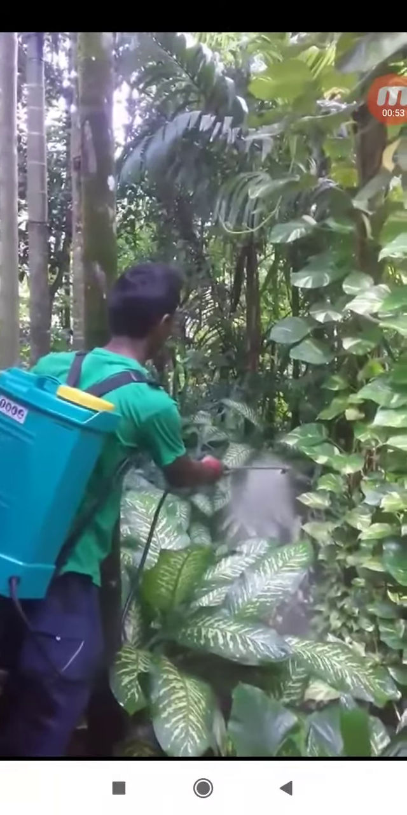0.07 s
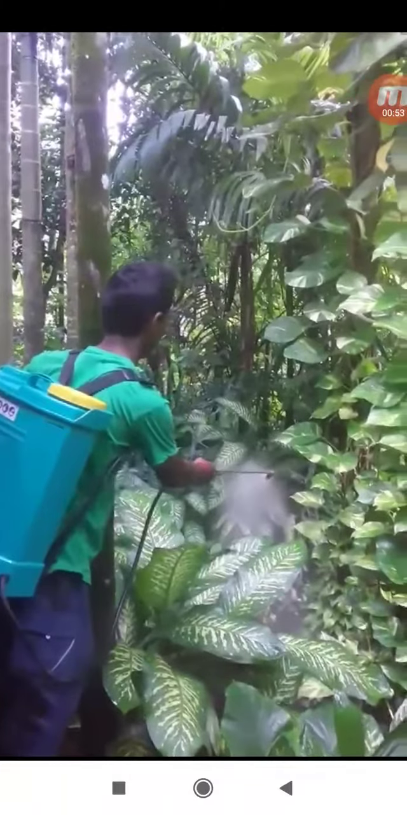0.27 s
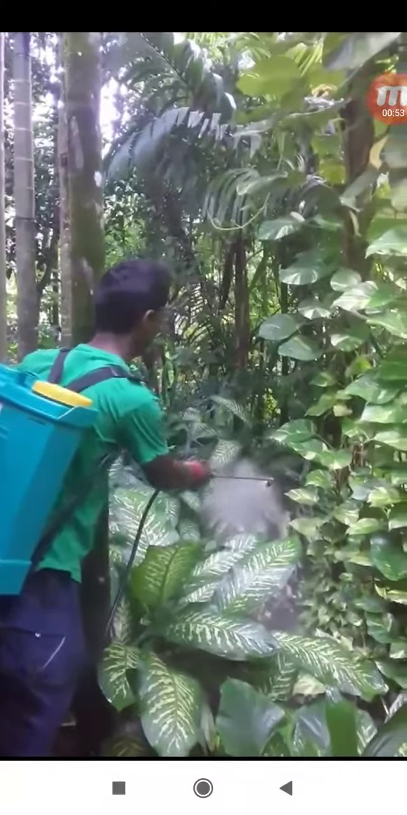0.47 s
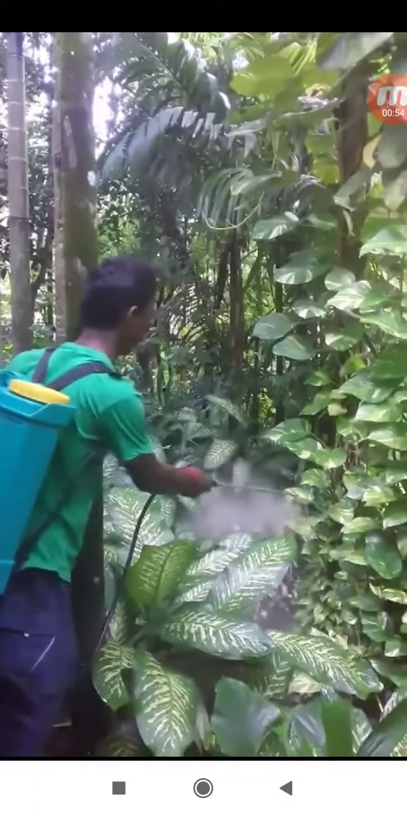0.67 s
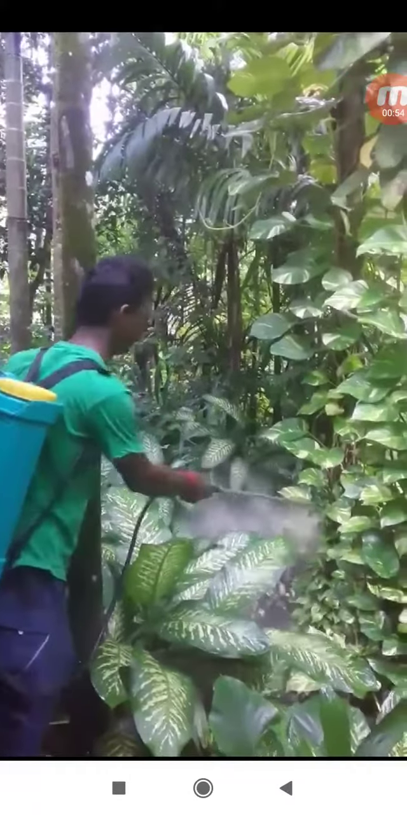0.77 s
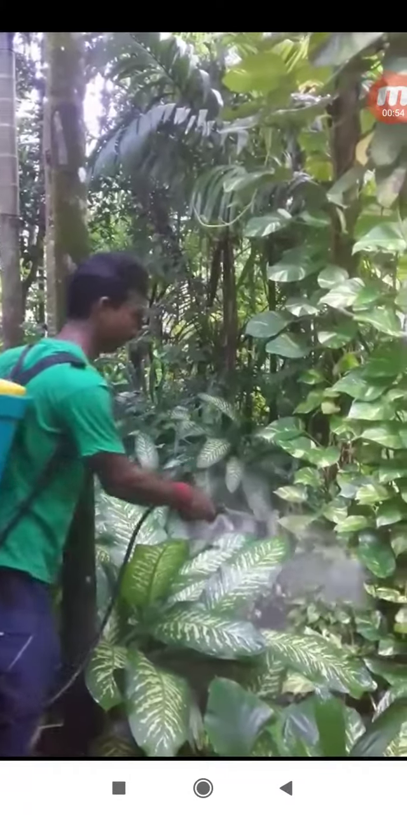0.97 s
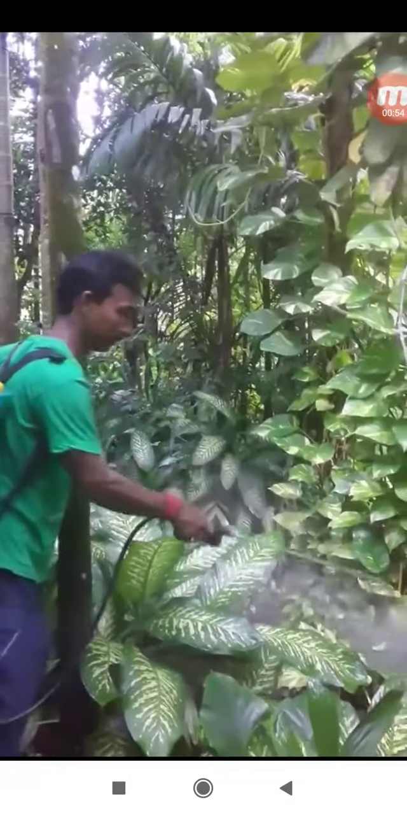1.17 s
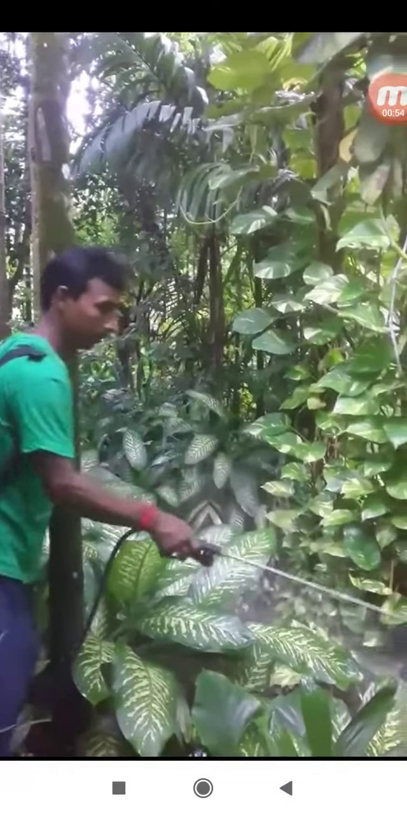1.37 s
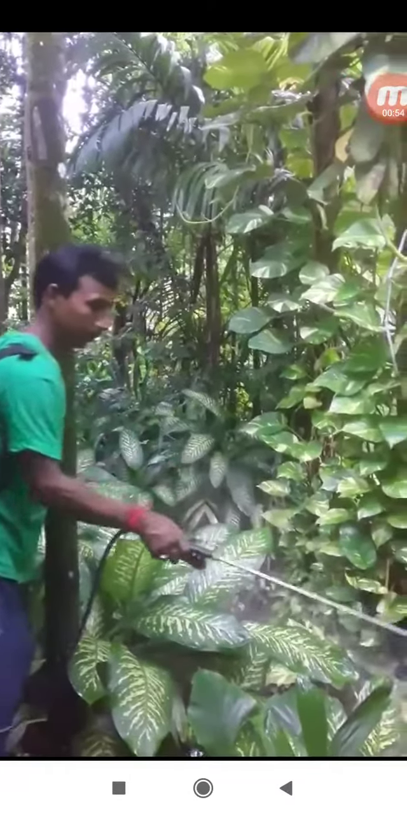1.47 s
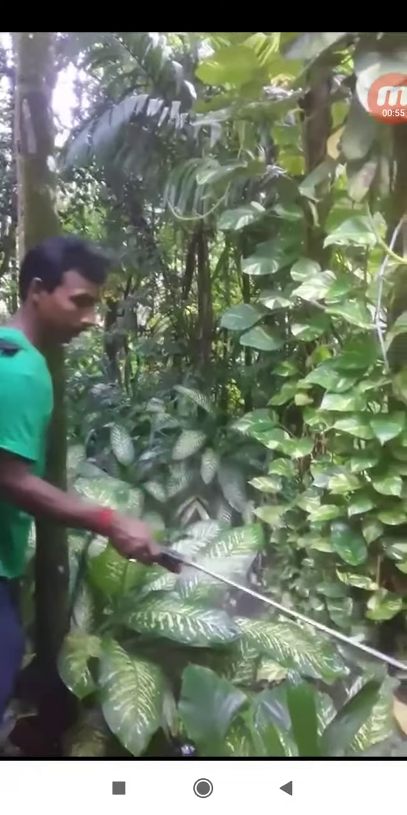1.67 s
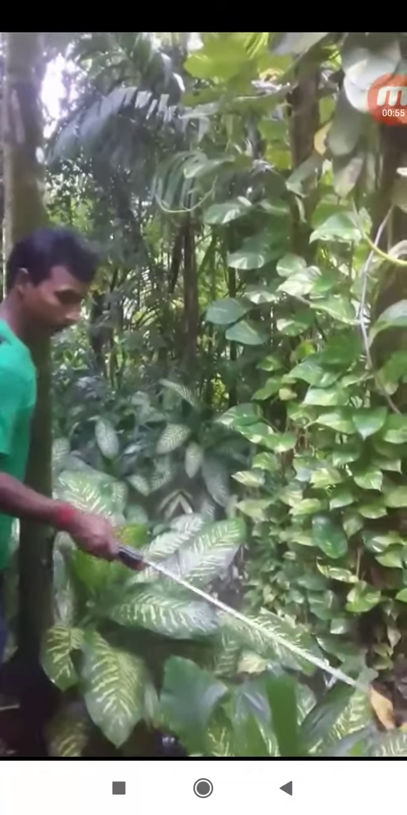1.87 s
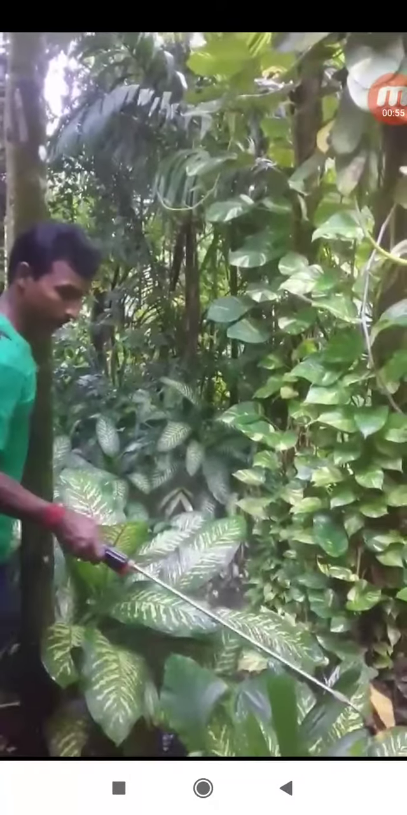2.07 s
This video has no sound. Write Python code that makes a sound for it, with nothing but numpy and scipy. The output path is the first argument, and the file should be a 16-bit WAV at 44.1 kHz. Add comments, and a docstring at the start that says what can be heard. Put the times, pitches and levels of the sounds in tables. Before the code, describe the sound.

A motorised backpack sprayer buzzes and rattles steadily from the start while its nozzle hisses onto leaves. Around 1 second the pump's tone shifts and the spray grows a little louder. Near 1.7 seconds the jet dies and the pump halts with a few quick hollow knocks. At 2 seconds one sharp, dry click sounds over the faint outdoor hiss that runs throughout.

```python
"""A motorised backpack sprayer among garden plants, heard through one small microphone.
At first the pump buzzes and knocks at 46 turns a second while the nozzle hisses.
Around 1 s the wearer turns, so the pump's tone shifts and the spray grows louder.
Near 1.7 s the jet dies and the pump knocks to a halt.
At 2 s one sharp click sounds over the faint outdoor hiss that is there throughout."""
import sys
import numpy as np
from scipy import signal
from scipy.fft import rfft, irfft, next_fast_len
from scipy.io import wavfile
from scipy.ndimage import map_coordinates

SR = 44100
rng = np.random.default_rng(int(sys.argv[2]) if len(sys.argv) > 2 else 0)


def waveform_to_disk(signal):
    """Save audio, clipped to [-1, 1], as 16-bit WAV at the path in sys.argv[1]."""
    frames = np.transpose(np.atleast_2d(signal))
    scaled = np.clip(frames, -1, 1) * 32767
    samples = np.round(scaled).astype(np.int16)
    wavfile.write(sys.argv[1], SR, samples)


N = 93536

# beats of the pump's diaphragm and valves within one turn: share_of_turn, strength
PUMP_BEATS = [(.16, 1), (.34, .45), (.6, 1.04), (.96, .62)]


def pump():
    """The running pump buzzes and rattles, then slows a little and fades out."""
    # how fast it runs: time_s, turns_per_s
    speed = [(0, 45.97), (1.0, 45.97), (1.64, 45.9), (1.69, 45.5), (1.8, 42.5)]
    # how loud it runs: time_s, level_db
    loudness = [(0, 0), (1.66, 0), (1.74, -2.5), (1.78, -9), (1.82, -19), (1.88, -36)]
    turns = np.cumsum(curve(speed)) / SR
    away = curve([(.76, 0), (1.24, 1)])  # the wearer turns: 0 = tank in view, 1 = tank turned away
    return amp(curve(loudness)) * (buzz(turns, away) + rattle(turns, away))


def buzz(turns, away):
    """Repeating beats make tones at multiples of the pump speed; their mix shifts as the wearer turns."""
    # the tones with the tank in view: speed_multiple, level_db
    tank_facing = [(4, -46), (5, -32), (6, -23), (7, -19), (8, -17), (9, -20), (10, -31), (11, -17),
                   (12, -11), (13, -18), (14, -15), (15, -14), (16, -10), (17, -12), (18, -18), (19, -17),
                   (20, -19), (21, -8), (22, -4), (23, 0), (24, -2), (25, -3), (26, -2), (27, -19),
                   (28, -21), (29, -9), (30, -17), (31, -14), (32, -22), (33, -13), (34, -15), (35, -18),
                   (36, -12), (37, -20)]
    # the tones with the tank turned away: speed_multiple, level_db
    tank_away = [(4, -41), (5, -30), (6, -17), (7, -15), (8, -15), (9, -20), (10, -17), (11, -18),
                 (12, -13), (13, -7), (14, -12), (15, -19), (16, -3), (17, -5), (18, -10), (19, -14),
                 (20, -9), (21, -12), (22, -7), (23, -4), (24, -5), (25, -3), (26, 0), (27, -6), (28, -10),
                 (29, -7), (30, -13), (31, -5), (32, -10), (33, -10), (34, -10), (35, -11), (36, -7),
                 (37, -12)]
    # the hum near 750 Hz swells and ebbs: time_s, boost_db
    hum_swell = [(.28, -2), (.42, 4), (.66, 3), (.76, -4), (.9, -5), (1.15, 2), (1.3, -3), (1.42, 0),
                 (1.52, -4)]
    facing_db, away_db, wander_db, tremble_db = -44, -47, 2.18, .5
    place, strength = np.transpose(PUMP_BEATS)
    tones, swell_db = np.zeros(N), curve(hum_swell)
    for (multiple, front_db), (_, back_db) in zip(tank_facing, tank_away):
        # each tone lines up roughly with the beats
        phase = np.angle(np.sum(strength * np.exp(-2j * np.pi * multiple * place)))
        phase += .62 * rng.standard_normal()
        level_db = (1 - away) * (facing_db + front_db) + away * (away_db + back_db)
        level_db += wander_db * wobble(4.78)
        level_db += swell_db * np.exp(-((multiple - 16) / 1.7) ** 2)  # only tones near the 16th swell
        tones += np.sqrt(2) * amp(level_db) * np.cos(2 * np.pi * multiple * turns + phase)
    return tones * amp(tremble_db * wobble(170))


def rattle(turns, away):
    """Every beat shakes the loose casing a little differently."""
    # tone colour of the casing: pitch_hz, level_db
    casing = [(100, -75), (190, -30), (300, -15.5), (480, -26.5), (700, -4.5), (870, -11), (1080, 4),
              (1300, -8), (1650, -1), (1850, -14.5), (2300, -0.5), (3200, -20.5), (6000, -54.5)]
    width_turns = .14
    shaking = 1 + sum(strength * np.exp(-(((turns - place + .5) % 1 - .5) / width_turns) ** 2)
                      for place, strength in PUMP_BEATS)
    return amp(-44.5 + .5 * away) * unit(coloured(shaking * rng.standard_normal(N), casing))


def last_knocks():
    """The slowing pump knocks and its hollow chamber rings; the later the knock, the lower the ring."""
    # the knocks: start_s, level_db
    knocks = [(1.656, -35), (1.678, -34), (1.701, -30), (1.711, -27.5), (1.7235, -28), (1.7335, -27),
              (1.745, -31), (1.759, -37), (1.778, -31.5), (1.802, -42)]
    # the chamber's ringing tones: pitch_hz, level_db, fade_s (time to fall 60 dB)
    chamber = [(430, -16, .03), (610, -8, .03), (825, 0, .032), (1020, -5, .028), (1180, -3.5, .028),
               (1690, -10, .02)]
    sag_per_s, rise_s = .7, .001
    no_bass = signal.butter(4, 400, "high", fs=SR, output="sos")
    sound = np.zeros(N)
    for start_s, knock_db in knocks:
        age_s = seconds_since(start_s)
        sag = 1 - sag_per_s * (start_s - knocks[0][0])
        ring = np.zeros(N)
        for pitch_hz, level_db, fade_s in chamber:
            fade = amp(level_db + rng.normal(0, 1) - 60 * age_s / fade_s)
            ring += fade * np.sin(2 * np.pi * pitch_hz * sag * age_s)
        sound += amp(knock_db) * signal.sosfilt(no_bass, ring * (1 - np.exp(-age_s / rise_s)))
    return sound


def spray():
    """A fluttering jet hisses from the nozzle, and droplets tick on the leaves."""
    # how loud the spray is: time_s, level_db
    flow = [(0, -35.5), (.7, -35.5), (.8, -37), (1.05, -34), (1.28, -35.5), (1.39, -32), (1.42, -35),
            (1.445, -31.5), (1.49, -32), (1.52, -34.5), (1.545, -31.5), (1.635, -32), (1.676, -34),
            (1.688, -42), (1.79, -47.5), (1.88, -58)]
    # tone colour of the nozzle's hiss: pitch_hz, level_db
    mist = [(120, -62), (400, -39), (1000, -28), (1700, -16), (1860, -23), (2030, -10), (2350, -5),
            (2750, -15), (3080, -16), (3280, -26), (3480, -26), (3700, -17), (3950, -3), (4230, 1),
            (4560, -6), (4800, -16), (5020, -30), (5450, -27), (5950, -13.5), (6450, -17.5), (7200, -28.5),
            (7850, -26), (8400, -13.5), (8750, -14), (9150, -17.5), (9650, -11), (9900, -14), (10250, -26),
            (10700, -14.5), (11100, -14.5), (11700, -26), (12450, -25), (13600, -28), (14100, -33),
            (15600, -33)]
    flutter_db, surge_db, drops_per_s = .5, .15, 240
    jet = unit(rng.standard_normal(N) * amp(flutter_db * wobble(170) + surge_db * wobble(19.5)))
    sizes = amp(-1.5 * np.clip(rng.standard_normal(N), -2, 2))
    hits = rng.random(N) < drops_per_s / SR
    drops = unit(hits * sizes * rng.choice([-1, 1], N))
    return amp(curve(flow)) * unit(coloured(jet + amp(-17) * drops, mist))


def click():
    """A dry snap, perhaps the spray wand's plastic trigger, with brief spits of fizz around it."""
    # a faint tick, then the snap: start_s, peak_db, fade_s
    snaps = [(1.9895, -38, .022), (2.0069, -13.2, .0075)]
    # their tone colour: pitch_hz, level_db
    plastic = [(100, -48), (300, -21), (750, -7.5), (1300, -11), (1900, -8), (2300, 1), (2700, -8),
               (3100, -5), (3450, -9), (4100, 3.5), (5000, -18), (6000, -10), (7200, -21), (8800, -8),
               (10500, -17), (16000, -44)]
    # spits before and after the snap: start_s, level_db, fade_s
    spits = [(1.9895, -36, .03), (2.014, -42, .1), (2.051, -50, .1)]
    # their tone colour: pitch_hz, level_db
    fizz = [(3000, -32), (7500, -18), (9700, 0), (11500, -15), (15500, -25)]
    spitting = sum(amp(level_db) * burst(start_s, fade_s, rise_s=.0017)
                   for start_s, level_db, fade_s in spits)
    sound = coloured(spitting, fizz)
    for start_s, peak_db, fade_s in snaps:
        spectrum = rfft(burst(start_s, fade_s, rise_s=.0001))
        strength = np.abs(spectrum)
        even = irfft(spectrum / (strength + .1 * strength.mean()), N)  # all pitches about equally loud
        snap = coloured(even, plastic)
        sound += amp(peak_db) * snap / np.abs(snap).max()
    return sound


def outdoors():
    """A faint, slightly restless outdoor hiss."""
    # tone colour of the background: pitch_hz, level_db
    garden = [(30, -36), (260, -30), (440, -13), (880, -1), (1150, -5), (1620, -5), (1900, -18), (2340, -2),
              (3300, -19), (4000, -6), (4450, -7), (5200, -20), (6300, -9), (7400, -23), (8400, -10),
              (9650, -6), (10300, -18), (10900, -13), (15000, -40)]
    level_db = -50 + wobble(23.87)
    return amp(level_db) * unit(coloured(rng.standard_normal(N), garden))


def amp(db):
    """Turn decibels into a number to multiply by."""
    return 10 ** (np.asarray(db) / 20)


def unit(sound):
    """Scale a sound to an average (rms) level of 1."""
    return sound / np.sqrt(np.mean(sound ** 2) + 1e-20)


def curve(rows):
    """Join (time_s, value) rows with straight lines, one value per sample."""
    return np.interp(np.arange(N) / SR, *np.transpose(rows))


def wobble(points_per_s):
    """A smooth curve through random points."""
    points = rng.standard_normal(int(N * points_per_s / SR) + 4)
    return map_coordinates(points, [np.arange(N) * points_per_s / SR])


def seconds_since(start_s):
    """A clock that stays at zero until start_s."""
    return np.maximum(np.arange(N) / SR - start_s, 0)


def burst(start_s, fade_s, rise_s):
    """Noise that rises quickly and falls 60 dB in fade_s."""
    age_s = seconds_since(start_s)
    return rng.choice([-1, 1], N) * amp(-60 * age_s / fade_s) * (1 - np.exp(-age_s / rise_s))


def coloured(sound, colour):
    """Filter a sound; (pitch_hz, level_db) rows say how strong each pitch is next to the others."""
    size = 2 * next_fast_len(N)
    pitch_hz, level_db = np.transpose(colour)
    grid_hz = np.fft.rfftfreq(size, 1 / SR)
    gain = amp(np.interp(np.log(grid_hz + 1), np.log(pitch_hz + 1), level_db))
    # make the filter ring only after a sound, never before it
    cepstrum = irfft(np.log(gain + 1e-6), size)
    cepstrum[1:size // 2] *= 2
    cepstrum[size // 2 + 1:] = 0
    filtered = irfft(rfft(sound, size) * np.exp(rfft(cepstrum)), size)[:N]
    return filtered / np.sqrt(np.mean(gain ** 2))


def scene():
    """Everything reaches one microphone, so left and right are the same."""
    mono = last_knocks() + pump() + spray() + click() + outdoors()
    return np.array([mono, mono])


def record(dry):
    """The recorder keeps nothing above top_hz."""
    top_hz = 15700
    size = next_fast_len(N + SR // 2)
    kept = np.fft.rfftfreq(size, 1 / SR) < top_hz
    return irfft(rfft(dry, size) * kept, size)[:, :N]


dry = scene()
out = record(dry)
waveform_to_disk(out)
```